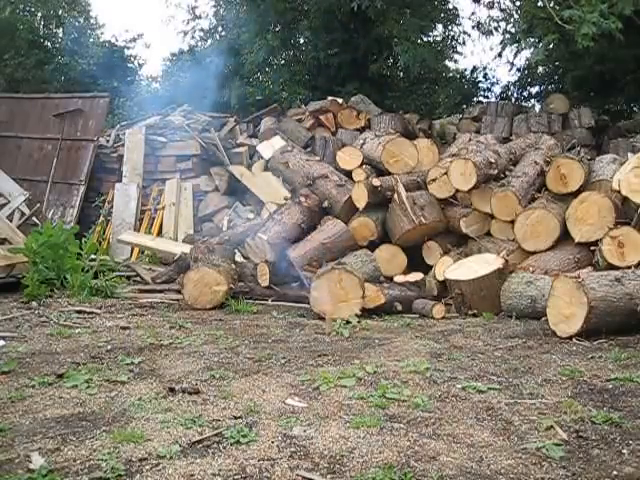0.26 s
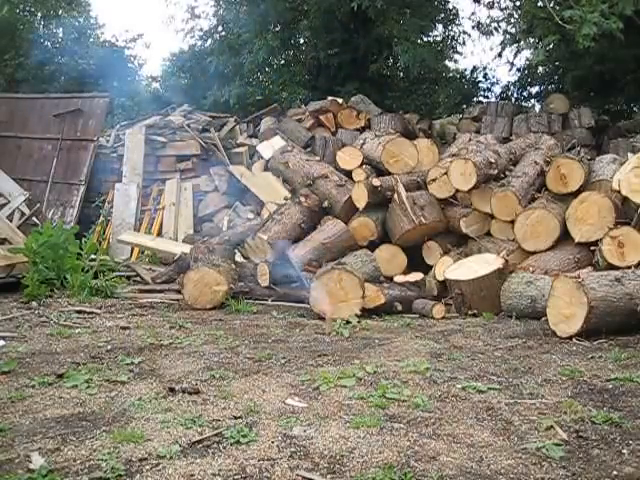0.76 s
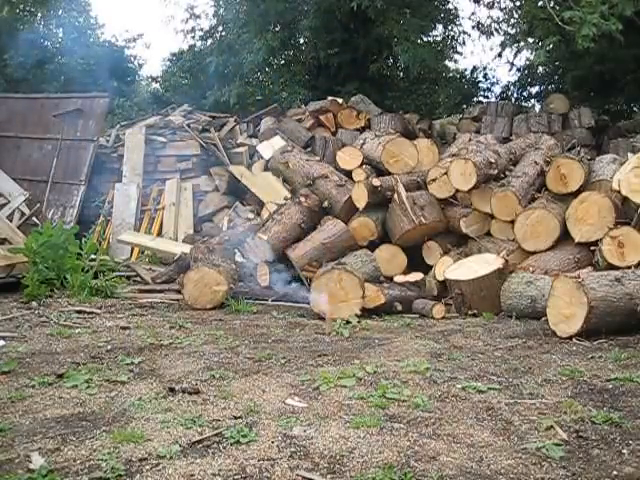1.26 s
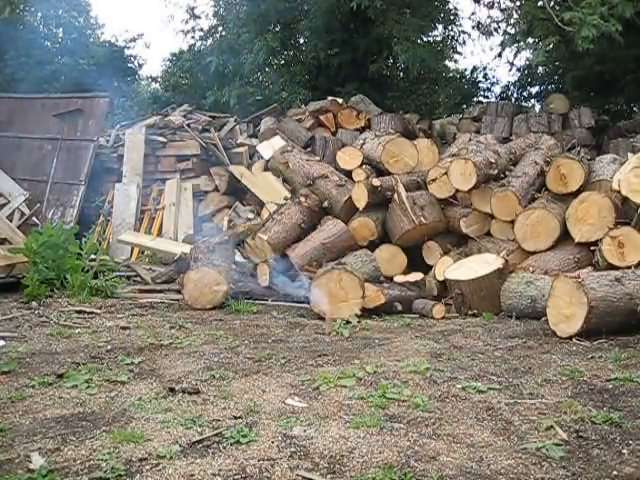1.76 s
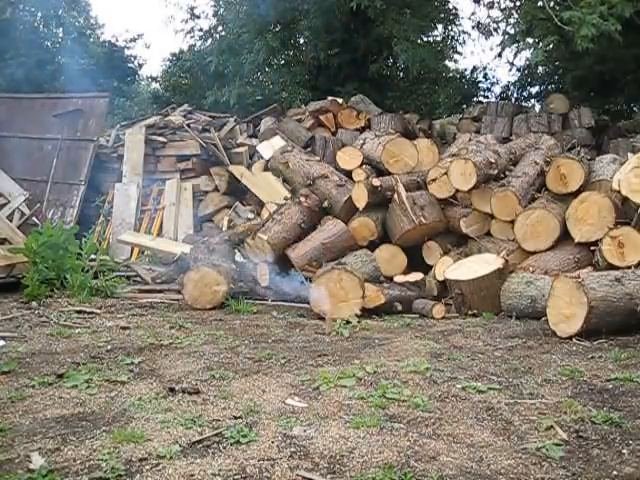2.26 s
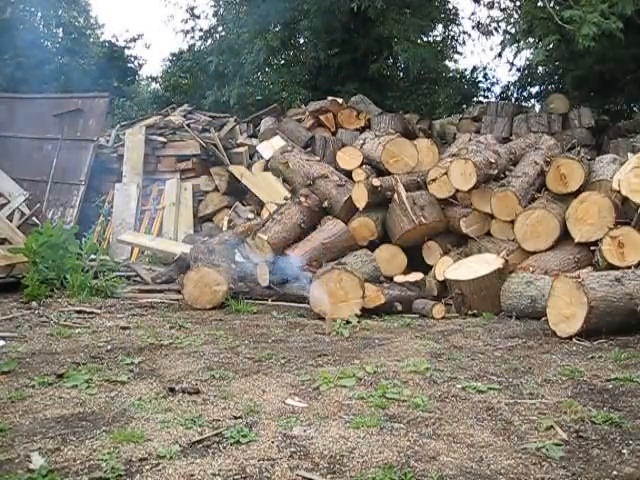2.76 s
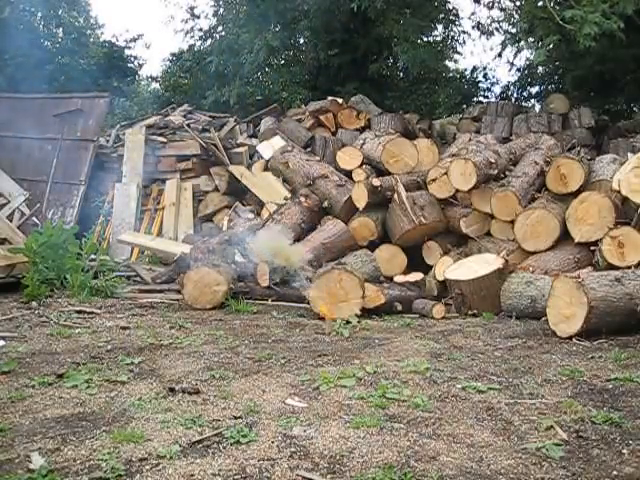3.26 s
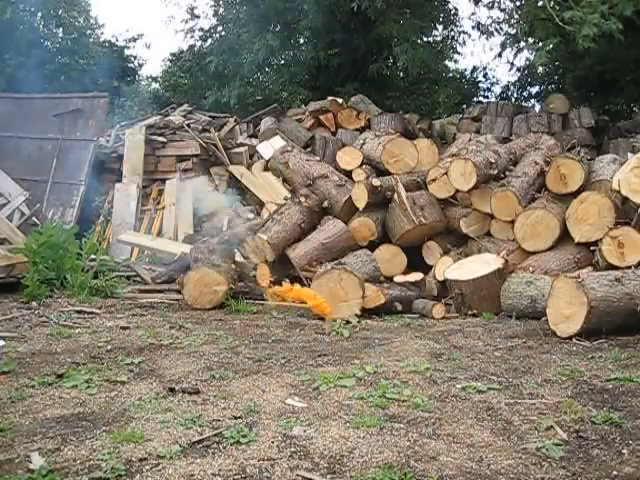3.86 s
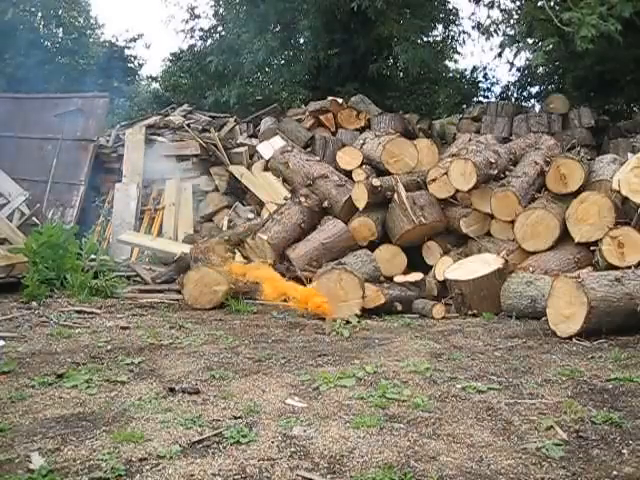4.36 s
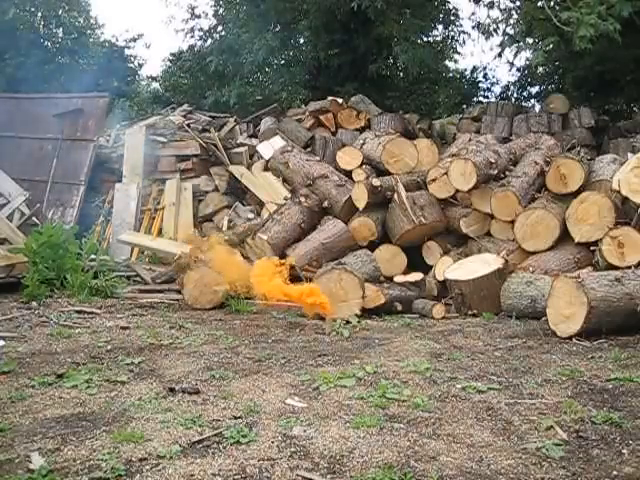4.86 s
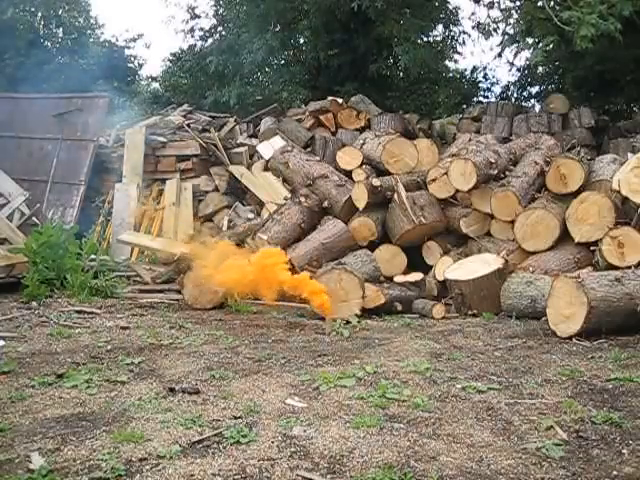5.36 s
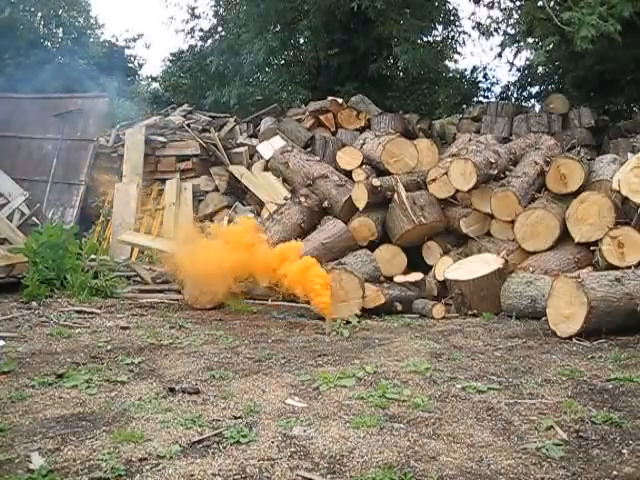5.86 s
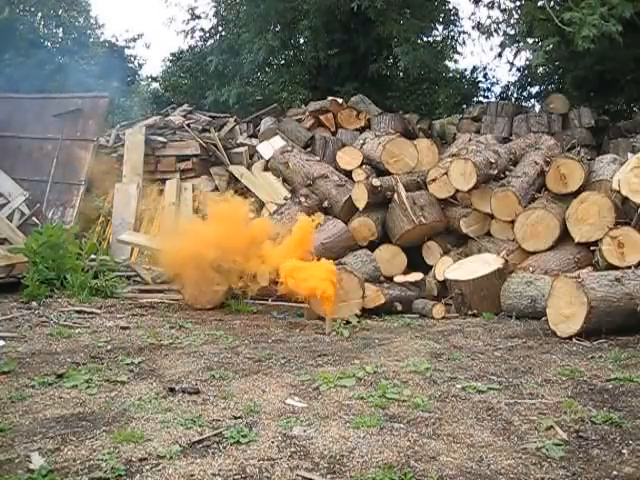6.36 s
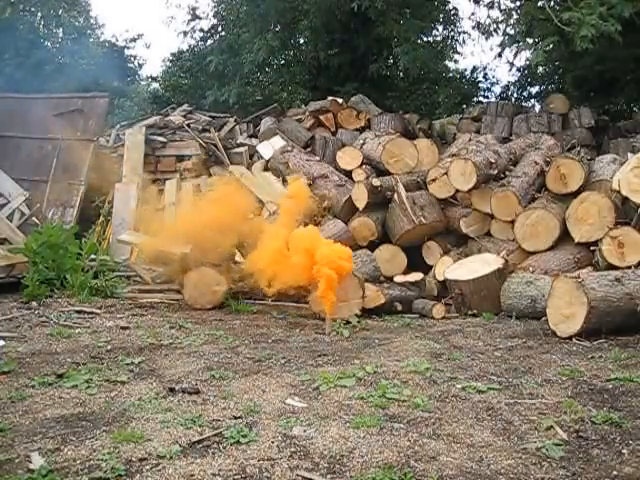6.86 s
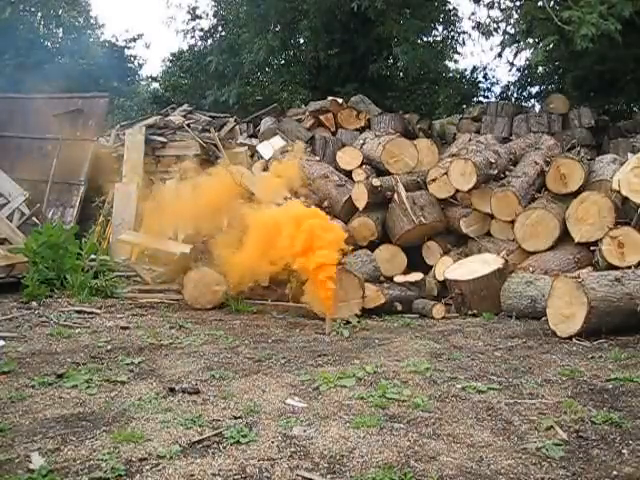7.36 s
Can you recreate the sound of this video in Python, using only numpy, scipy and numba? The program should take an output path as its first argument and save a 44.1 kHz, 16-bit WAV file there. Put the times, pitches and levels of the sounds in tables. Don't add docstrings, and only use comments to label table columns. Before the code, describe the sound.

A smoke bomb some metres from a small camera's built-in microphone: first a steady gas hiss with a whistling edge, dying abruptly just after three seconds. Then a much quieter passage of weak fizzing, short puffing spits and low hollow wind gusts. Finally a broad hiss of escaping smoke grows steadily louder with quick flares, over a dull far rotor thump and soft yard background. The sound is slightly hollow and thin.

```python
import sys
import numpy as np
from scipy import signal
from scipy.fft import rfft, irfft
from scipy.io import wavfile
from scipy.ndimage import uniform_filter1d
from numba import njit

SR = 44100
rng = np.random.default_rng(int(sys.argv[2]) if len(sys.argv) > 2 else 0)


def volts_from_decibels(level):
    exponent = np.asarray(level, float) / 20
    return 10 ** exponent


def unload_wav(signal):
    wavfile.write(
        sys.argv[1],
        SR,
        np.round(np.clip(np.atleast_2d(signal).T, -1, 1) * 32767).astype(np.int16),
    )


N = 336042
TIME = np.arange(N) / SR
HZ = np.fft.rfftfreq(N, 1 / SR)
SLOT_HZ = 7820

# f/Hz, density/dB per Hz
UPPER_COLOUR = [(8100, -22), (8800, -14.5), (10000, -10.5), (11200, -8.5), (12200, -5.5), (13300, -10.5),
                (14400, -18), (16000, -32)]
# f/Hz, density/dB per Hz
SMOULDER_COLOUR = [(710, -19), (1200, -11), (1500, -12), (1650, -4), (1820, -12.5), (2530, -12.5),
                   (3150, -13.5), (3480, -4.5), (3900, -9), (4700, -8), (5600, -9.5), (6300, -14.5),
                   (7700, -25)]


def unit(x):
    return x / np.sqrt(np.mean(x ** 2))


def on_log(table):
    hz, value = np.transpose(table)
    return np.interp(np.log(HZ + 1), np.log(hz), value)


def played(table):
    s, *columns = np.transpose(table)
    return [np.interp(TIME, s, column) for column in columns]


def noise(gain):
    return unit(irfft(rfft(rng.standard_normal(N)) * gain, N))


def above(hz, soft=0.026):
    return 0.5 + 0.5 * np.tanh(np.log((HZ + 1) / (hz + 1)) / soft)


def walk(rate_hz):
    hold = int(SR / rate_hz)
    steps = np.repeat(rng.standard_normal(N // hold + 1), hold)
    slewed = uniform_filter1d(uniform_filter1d(steps, hold), hold)
    return unit(slewed[:N])


def bump(s, half_s):
    return np.exp(-((TIME - s) / half_s) ** 2)


@njit
def svf(x, hz, width):
    y, band, low = np.empty(len(x)), 0., 0.
    for i in range(len(x)):
        g, k = np.tan(np.pi * hz[i] / SR), width / hz[i]
        v = (band + g * (x[i] - low)) / (1 + g * (g + k))
        band, low = 2 * v - band, low + 2 * g * v
        y[i] = k * v
    return y


def hiss(level_db, tilt_db, focus_db, top_hz, choke_db, top_db, top_follows, edge_ring_hz, hz_per_tilt,
         colour, flutter_db, eddy_db, own_db, ring, ring_width_hz):
    # from/Hz, to/Hz
    bands_hz = [
        [(0, 1450), (3250, 4500)],
        [(1450, 3250)],
        [(4500, 7900)],
        [(7900, 22050)],
    ]
    # t/s, change/dB, half length/s
    flares = [(0.028, -3, 0.014), (0.14, -1, 0.013), (0.253, 0, .03), (0.423, -0.3, .03), (0.634, -3, 0.01),
              (0.665, 0, 0.017), (0.73, -2, 0.03), (1.074, -1.8, 0.028), (2.786, 0.5, 0.019),
              (2.852, -3.5, 0.02), (2.904, 2, 0.028), (3.18, -4.5, .015), (6.226, 3, 0.011),
              (6.48, 1.5, 0.11), (6.608, 2.5, 0.013), (6.69, -0.5, 0.0099), (6.731, 5.5, 0.0097),
              (6.88, -1.5, 0.034), (7.07, 3, 0.014), (7.157, 0.5, 0.016), (7.294, -1.5, 0.032),
              (7.36, 2, 0.015), (7.4, -1.5, .012), (7.438, 3.5, 0.013), (7.51, 2, .012),
              (7.547, -0.5, .015), (7.61, 4.5, 0.033)]
    choke_tilt = 0.57
    choke_hz_per_db = 88
    top_flare = 0.28
    throat_ring = 0.25

    flare_db = sum(db * bump(s, half_s) for s, db, half_s in flares)
    levels = [level_db + focus_db - choke_db,
              level_db - tilt_db / 2,
              level_db + tilt_db / 2 + choke_tilt * choke_db,
              level_db + top_db + top_follows * focus_db + top_flare * flare_db]
    edge_hz = edge_ring_hz + hz_per_tilt * tilt_db + choke_hz_per_db * choke_db
    shared_db = flutter_db * walk(32) + eddy_db * walk(260) + flare_db

    gas = volts_from_decibels(np.where(HZ < SLOT_HZ, on_log(colour), on_log(UPPER_COLOUR)))
    bands = []
    for spans in bands_hz:
        power = sum(above(lo) * (1 - above(hi)) for lo, hi in spans)
        bands.append(noise(gas * np.sqrt(power)))
    _, throat, edge, top = bands
    bands[1] = unit(throat + throat_ring * svf(throat, edge_hz / 2, ring_width_hz / 2))
    bands[2] = unit(edge + ring * svf(edge, edge_hz, ring_width_hz / 2))
    bands[3] = unit(top + ring * svf(top, top_hz, ring_width_hz))
    return sum(band * volts_from_decibels(db + shared_db + own_db * walk(30)) for band, db in zip(bands, levels))


def fuse():
    # t/s, level/dB, tilt of edge over throat/dB, focus of the core ring/dB, top ring f/Hz
    flame = [
        (0.0, -33, 4.5, 8, 12300),
        (0.5, -33.5, 5.5, 8.5, 12600),
        (0.69, -32.5, 6, 6.5, 12700),
        (0.8, -36, 8.5, 7, 10600),
        (1.26, -34, 12, 4, 12200),
        (1.8, -32.5, 7, 2, 12800),
        (2.17, -33.5, 1.5, 2, 11900),
        (2.74, -34.5, -5.5, 5, 10900),
        (3.05, -33, -2.5, 4, 11900),
    ]
    # f/Hz, density/dB per Hz
    fuse_colour = [(290, -46), (500, -29), (658, -26), (856, -16.5), (1230, -15.5), (1430, -16), (2070, -5),
                   (3190, -7), (3830, -0.5), (5990, -1), (7700, -17.5), (10000, -56), (16900, -120)]
    dies_s, bend_s, fade_db_per_s, choke_db_per_s = 3.056, 0.026, 192, 108
    level_db, tilt_db, focus_db, top_hz = played(flame)
    late = np.clip(TIME - dies_s, 0, 0.4)
    dying = late ** 2 / (late + bend_s)
    return hiss(level_db - fade_db_per_s * dying, tilt_db, focus_db, top_hz, choke_db_per_s * dying,
                top_db=0.4, top_follows=1.05, edge_ring_hz=4910, hz_per_tilt=30, colour=fuse_colour,
                flutter_db=0.6, eddy_db=0.57, own_db=0.36, ring=0.44, ring_width_hz=2500.0)


def jet():
    # f/Hz, density/dB per Hz
    jet_colour = [(290, -43), (500, -19), (755, -20), (856, -15.5), (971, -19), (1310, -18), (1450, -17.5),
                  (3190, -13), (3460, -6), (5990, -15.5), (7700, -26.5), (10000, -58), (16900, -120)]
    lit_s, start_db, build_db, build_s = 5.266, -48.5, 17.5, 1.67
    tilt_db, focus_db, spread_db_per_s, top_hz = -1, 7, 1.04, 11900
    alight = np.sqrt(np.interp(TIME, [5.3, 5.45], [0, 1]))
    age = np.maximum(TIME - lit_s, 0)
    level_db = start_db + build_db * (1 - np.exp(-age / build_s))
    steady = np.ones(N)
    return alight * hiss(level_db, tilt_db * steady, focus_db - spread_db_per_s * age, top_hz * steady, 0,
                         top_db=9.5, top_follows=-1.26, edge_ring_hz=5100 * steady, hz_per_tilt=0,
                         colour=jet_colour, flutter_db=0.55, eddy_db=1.07, own_db=0.3,
                         ring=0.33, ring_width_hz=1300.0)


def smoulder():
    # t/s, level/dB, tilt of edge over throat/dB, focus of the core ring/dB, top ring f/Hz
    fizz = [
        (3.19, -56, 5, 2.5, 12000),
        (3.33, -54, 2, 1.5, 12300),
        (3.5, -51.5, 6, 3.5, 12330),
        (3.65, -49.5, 5.5, -1.5, 12000),
        (3.9, -48, 1.5, 0.4, 11900),
        (4.1, -51, 0, 1, 11500),
        (4.8, -51, 0, 5.5, 11100),
        (5.2, -51, 1, 6.5, 11200),
        (5.45, -48, -2, 6.5, 11800),
    ]
    alight = np.sqrt(np.interp(TIME, [3.18, 3.22, 5.3, 5.45], [0, 1, 1, 0]))
    return alight * hiss(*played(fizz), 0, top_db=3.5, top_follows=-0.13, edge_ring_hz=5250, hz_per_tilt=70,
                         colour=SMOULDER_COLOUR, flutter_db=-0.9, eddy_db=1.45, own_db=-0.2,
                         ring=0.94, ring_width_hz=1600.0)


def spits():
    # t/s, peak level/dB, lower band relative level/dB
    grains = [(3.2002, -27, 0), (3.302, -30, 4), (3.3404, -36, -12), (3.398, -32.5, 1), (3.6073, -31, 3),
              (3.638, -24, 3), (3.6701, -23, -13), (3.7465, -35, -8), (3.9435, -26, -10),
              (4.0109, -28, -11), (4.0383, -36, -2), (4.1077, -29, 1), (4.1466, -32, -10), (4.2927, -28, 0),
              (4.5716, -44, -6), (4.9438, -33, -13)]
    upper, lower, age = np.zeros(N), np.zeros(N), np.arange(1500) / SR
    puff = (1 - np.exp(-age / 0.0023)) * np.exp(-age / 0.0062)
    for s, db, lower_db in grains:
        i = int(s * SR)
        upper[i:i + len(age)] += volts_from_decibels(db - 11) * puff
        lower[i:i + len(age)] += volts_from_decibels(db + lower_db - 8.0) * puff
    split = above(SLOT_HZ)
    upper_gas = noise(volts_from_decibels(on_log(UPPER_COLOUR) / 2) * split)
    lower_gas = noise(volts_from_decibels(on_log(SMOULDER_COLOUR)) * (1 - split) * above(1200, 0.3))
    return upper * upper_gas + lower * lower_gas


def wind():
    # t of the peak/s, level/dB, half length/s, cavity f/Hz
    gusts = [(0.104, -37.5, 0.079, 377), (0.21, -41, 0.023, 425), (0.954, -43, .1, 354),
             (1.277, -38.5, 0.15, 376), (1.61, -43, 0.027, 400), (1.972, -39, 0.17, 397),
             (2.57, -42, 0.1, 332), (3.425, -40, 0.06, 380), (3.582, -36.5, 0.1, 340),
             (3.885, -42.5, 0.14, 420), (4.156, -39.5, 0.1, 325), (4.36, -38, 0.14, 345),
             (4.627, -40.5, 0.23, 373), (4.767, -34, 0.032, 340), (4.832, -29.5, 0.022, 347),
             (4.897, -31.5, 0.036, 357), (4.998, -31, 0.12, 426), (5.133, -31.5, 0.048, 383),
             (5.28, -36.5, 0.16, 373), (5.45, -41, 0.083, 400), (5.816, -37.5, 0.12, 355),
             (6.387, -39, 0.083, 367), (6.604, -41.5, 0.11, 340), (6.872, -39, 0.22, 365),
             (7.31, -43.5, 0.26, 375), (7.62, -41, 0.086, 340)]
    breeze_db, rush_db, rush_power, rush_peak_s = -46, -50.5, 1.43, 4.95
    gust_power = sum((volts_from_decibels(db) * bump(s, half_s)) ** 2 for s, db, half_s, _ in gusts)
    strength = np.sqrt(volts_from_decibels(2 * breeze_db) + gust_power)
    s, *_, hz = np.transpose(gusts)
    cavity_hz = np.interp(TIME, s, hz)
    lumps = volts_from_decibels(1.06 * walk(35)) * rng.standard_normal(N)
    cavity = unit(svf(svf(lumps, cavity_hz, 203.0), cavity_hz, 203.0))
    rush = noise(above(400, 0.22) * (1 - above(960, 0.13)))
    loose = (strength / volts_from_decibels(-36.5)) ** rush_power * (0.25 + 1.5 * bump(rush_peak_s, 0.06))
    return strength * cavity + volts_from_decibels(rush_db) * (0.47 + loose) * rush


def rotor():
    # t/s, level/dB
    approach = [
        (0, -59),
        (1.5, -91),
        (3, -54),
        (4.5, -48),
        (6, -44.5),
        (7.62, -39.5),
    ]
    blade_hz, start_s = 15.625, 0.05
    beats = np.arange(start_s, N / SR, 1 / blade_hz)
    pulses = np.zeros(N)
    pulses[(beats * SR).astype(int)] = volts_from_decibels(0.91 * rng.standard_normal(len(beats)))
    dull = (HZ / 85) ** 2.94 * np.exp(-(HZ / 95) ** 2.9)
    return volts_from_decibels(played(approach)[0] - 5.0) * unit(irfft(rfft(pulses) * dull, N))


def yard():
    # f/Hz, density/dB per Hz
    yard_colour = [(12, -41), (20, -4.5), (96, 2.5), (173, -4), (427, -3), (649, -8), (736, -4.5),
                   (1100, -8), (1600, -8), (1810, -8), (3000, -11.5), (3900, -53), (6600, -120)]
    level_db = -44 - 1.05 + 0.5 * walk(2.7)
    return volts_from_decibels(level_db) * noise(volts_from_decibels(on_log(yard_colour)) * (1 - above(2750, 0.33)))


def scene():
    burning = fuse() + smoulder() + jet() + spits()
    return (burning + wind() + rotor() + yard())[None]


def band_limit(x):
    return signal.sosfilt(signal.butter(12, 15900, fs=SR, output="sos"), x)


def record(dry):
    # phase lag/turns, f/Hz
    dips = [(0, 260), (1, 668), (2, 1001), (3, 1443), (4, 1780), (5, 2239), (6, 2530), (7, 2853), (8, 3273),
            (9, 3736), (10, 4016), (11, 4470), (12, 4760), (13, 5205), (14, 5599), (15, 6008), (16, 6438),
            (17, 6804), (18, 7246), (19, 7666), (21, 8495), (22, 8904), (24, 9720), (26, 10594),
            (28, 11445), (30, 12274), (34, 13867), (38, 15525), (54, 22050)]
    # f/Hz, share of the direct sound
    echo = [(300, 0.023), (900, 0.28), (2500, 0.33), (4500, 0.55), (7000, 0.98), (9000, 0.99),
            (12000, 0.34), (15000, 0.65)]
    # f/Hz, width/Hz, level/dB
    casing = [(609, 17, 4.5), (787, 25, -3.5), (1134, 41, -4.5), (1332, 12, 4), (1714, 29, 3.5),
              (1990, 37, -6), (2077, 30, 0), (2314, 27, -4.5), (2900, 21, 8.5), (3050, 24, 7.5),
              (3330, 44, 4), (3386, 37, 9.5), (3354, 21.6, -13), (3748, 140, 5), (3868, 18, -8.5),
              (4360, 32, -6.5), (4636, 12, 4), (5000, 16, -3), (5621, 45, 9.5), (5922, 22, 5.5),
              (7300, 40, -2), (8870, 39, 0), (8450, 60, -1.5), (9390, 37, 0.5), (9070, 50, 2),
              (9790, 40, 12), (11700, 65, 1), (15000, 60, 4)]
    slot_width_hz, slot_depth_db, top_hz = 217, -24, 15880
    circuit_db, circuit_top_hz, whine_db, whine_hz = -66, 15800, -71.5, 15734.3

    turns, hz = np.transpose(dips)
    share = np.clip(on_log(echo), 0, 0.82)
    lag = np.exp(-2j * np.pi * np.interp(HZ, hz, turns))
    comb = (1 - share * lag) / np.sqrt(1 + share ** 2)
    casing_db = sum(db * np.exp(-((HZ - f) / width) ** 2) for f, width, db in casing)
    slot_db = slot_depth_db * np.exp(-((HZ - SLOT_HZ) / slot_width_hz) ** 2)
    response = comb * volts_from_decibels(casing_db + slot_db) * (1 - above(top_hz, 0.004))
    heard = irfft(rfft(dry) * response, N)
    circuit = volts_from_decibels(circuit_db) * noise(above(13500, 0.1) * (1 - above(circuit_top_hz, 0.04)))
    whine = volts_from_decibels(whine_db) * np.sin(2 * np.pi * whine_hz * TIME)
    return band_limit(heard + circuit + whine)


dry = scene()
out = record(dry)
unload_wav(out)
```